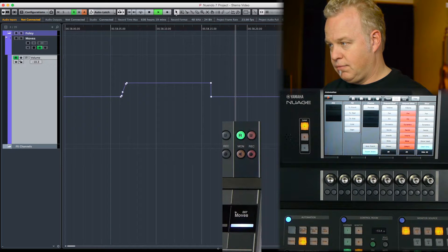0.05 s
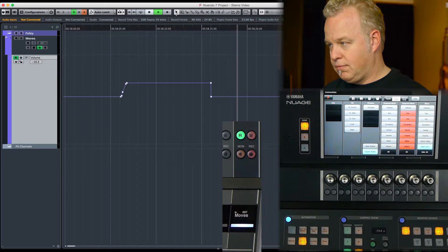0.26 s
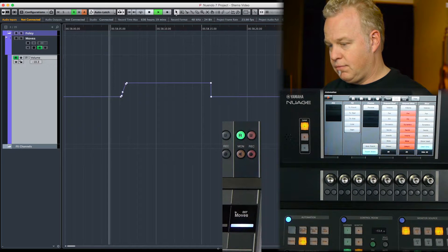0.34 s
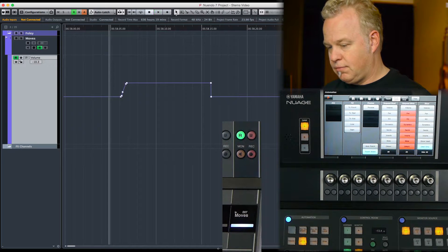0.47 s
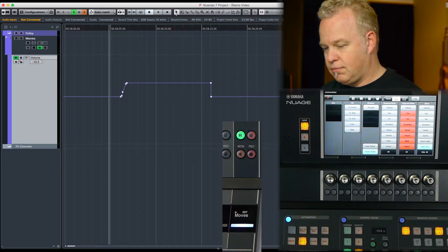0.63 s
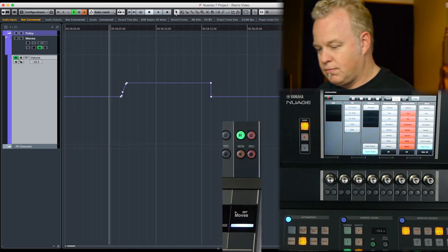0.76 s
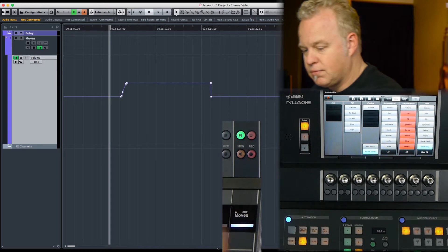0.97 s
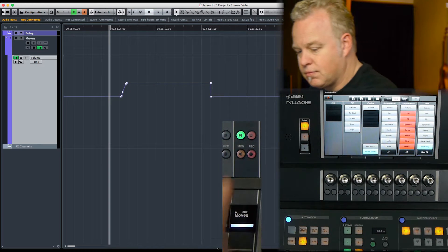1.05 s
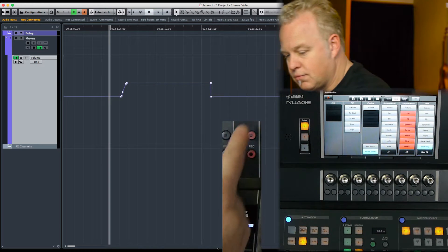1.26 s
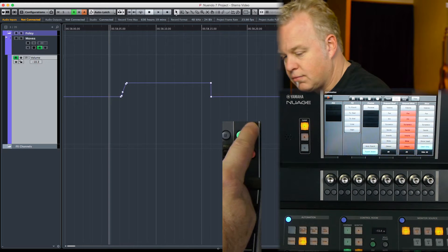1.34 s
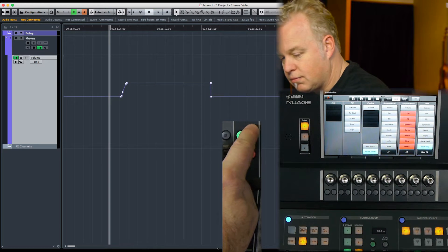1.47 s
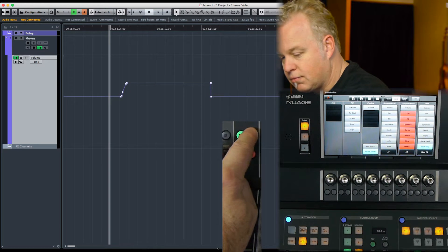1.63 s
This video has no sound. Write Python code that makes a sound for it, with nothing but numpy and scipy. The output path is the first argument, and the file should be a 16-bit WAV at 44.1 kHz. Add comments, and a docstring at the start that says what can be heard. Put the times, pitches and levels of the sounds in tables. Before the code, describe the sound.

Close up in a nearly silent, damped studio, a desk key snaps down and clicks back more quietly, followed by a tiny padded bump and very faint cloth movement over soft equipment fan noise.

```python
"""A faint fan hum and deep rumble are heard first; then a plastic key on a control desk is pushed and let go.
Its cap rattles in its guide, hits bottom, then springs back against its stop: bursts of coloured noise
with fading sine tones for the cap and the desk panel. A soft thud of padded noise bursts follows.
A sleeve rustles as an arm moves: three bands of noise that swell and fade.
One close microphone hears it in a quiet, damped studio with a short and a weaker, slower reverberation."""
import sys
import numpy as np
from scipy import signal
from scipy.fft import rfft, irfft
from scipy.io import wavfile
from scipy.ndimage import map_coordinates

SR = 44100
rng = np.random.default_rng(int(sys.argv[2]) if len(sys.argv) > 2 else 0)


def inscribe(sig):
    """Save sig as 16-bit PCM at rate SR to the path in sys.argv[1].

    A 1-D sig is mono; a 2-D sig holds one channel per row.
    Samples are clipped to [-1, 1] before scaling.
    """
    pcm = np.round(np.clip(np.atleast_2d(sig).T, -1, 1) * 32767)
    wavfile.write(sys.argv[1], SR, pcm.astype(np.int16))


def convert_level_to_amplitude(level_db):
    """Map a level in decibels to its linear amplitude factor."""
    exponent = np.asarray(level_db, float) / 20
    return 10 ** exponent


N = 74970  # length in samples


def unit(x):
    """Scale a sound to an rms of 1."""
    return x / np.sqrt(np.mean(x ** 2) + 1e-20)


def along(points, hz):
    """Read values between (frequency, value) points, on a log frequency axis."""
    point_hz, value = np.transpose(points)
    return np.interp(np.log(hz + 1), np.log(point_hz + 1), value)


def wobble(rate_hz):
    """A smooth curve through random points, rate_hz points a second."""
    points = rng.standard_normal(int(N * rate_hz / SR) + 4)
    return map_coordinates(points, [np.arange(N) * rate_hz / SR])


def level_curve(time_s, level_db):
    """Loudness that moves in straight dB lines between the given times."""
    return convert_level_to_amplitude(np.interp(np.arange(N) / SR, time_s, level_db))


def noise(spectrum, size, tilt_db=0):
    """Coloured noise of rms 1, tilted about 3 kHz by tilt_db per octave."""
    hz = np.fft.rfftfreq(size, 1 / SR)
    gain = convert_level_to_amplitude(along(spectrum, hz) + tilt_db * np.log2((hz + 50) / 3000))
    white = rng.standard_normal(size)
    return unit(irfft(rfft(white) * gain, size))


def burst(spectrum, level_db, rise_s, t60_s, tilt_db=0):
    """Noise that rises fast and dies away, falling 60 dB in t60_s."""
    t = np.arange(8192) / SR
    rise = 1 - np.exp(-(t / rise_s) ** 2)
    return noise(spectrum, size=8192, tilt_db=tilt_db) * convert_level_to_amplitude(level_db - 60 * t / t60_s) * rise


def ring(modes, ring_db, rise_s, tilt_db=0):
    """A struck solid rings in fading sine tones, each a little louder or softer at every blow."""
    scatter_db = 2
    t = np.arange(SR // 2) / SR
    out = np.zeros(len(t))
    for pitch_hz, level_db, t60_s in modes:
        tilted_db = level_db + tilt_db * np.log2(pitch_hz / 500)
        start_db = tilted_db + scatter_db * rng.standard_normal()
        out += convert_level_to_amplitude(start_db - 60 * t / t60_s) * np.sin(2 * np.pi * pitch_hz * t)
    return convert_level_to_amplitude(ring_db) * (1 - np.exp(-t / rise_s)) * out


def add(track, start_s, sound):
    """Mix a sound into the track at a time."""
    part = track[round(start_s * SR):][:len(sound)]
    part += sound[:len(part)]


def rumble():
    """Very low noise that comes and goes."""
    # loudness of the rumble: time_s, level_db
    levels = [(0.0, -75), (0.194, -83.5), (0.24, -51), (0.298, -67), (0.35, -68), (0.728, -76.5),
              (0.808, -68.5), (1.202, -78), (1.7, -77)]
    # colour of the rumble: pitch_hz, level_db (per Hz, relative)
    colour = [(15, -29.5), (30, -0.5), (80, -0.5), (120, -19.5), (200, -60.5)]
    time_s, level_db = np.transpose(levels)
    return level_curve(time_s, level_db) * noise(colour, size=N)


def fans():
    """Equipment fans: a low rush of air with a few tones that waver in level and phase."""
    # colour of the rush: pitch_hz, level_db (per Hz, relative)
    rush_colour = [(15, -50), (40, -12), (90, -3.5), (150, -1.5), (300, -2.5), (550, -6.5), (1000, -12.5),
                   (2000, -24.5), (4500, -21.5), (7000, -28), (12000, -35.5), (15500, -46), (16000, -81)]
    # fan tones: pitch_hz, level_db (rms, before wavering)
    hum = [(153, -80), (230, -78), (540, -82.5)]
    rush_db, swell_db, waver_db = -69.5, 1, 2.5  # the last two scale random curves
    t = np.arange(N) / SR
    tones = np.zeros(N)
    for pitch_hz, level_db in hum:
        loudness = np.sqrt(2) * convert_level_to_amplitude(level_db + waver_db * wobble(42))  # sqrt(2) turns rms into peak
        tones += loudness * np.sin(2 * np.pi * pitch_hz * t + wobble(2))
    rush = convert_level_to_amplitude(rush_db + swell_db * wobble(5)) * noise(rush_colour, size=N)
    return rush + tones


def sleeve():
    """Cloth rubbing on cloth makes noise; three bands swell separately under one fine, shared flutter."""
    # loudness of the rustle: time_s, middle_db, treble_db, low_db
    levels = [(0.561, -87, -93.5, -79.5), (.66, -71.5, -86, -85), (.74, -83, -82.5, -75.5),
              (.86, -70, -78.5, -83.5), (0.958, -75, -81.5, -80.5), (1.04, -71.5, -75.5, -73.5),
              (1.18, -71, -78, -78), (1.29, -67, -86.5, -68.5), (1.36, -74.5, -88, -75.5),
              (1.42, -80.5, -95, -84), (1.55, -97.5, -99, -97.5)]
    # colours of the three bands, each: pitch_hz, level_db (per Hz, relative)
    middle = [(1200, -10), (2000, -5), (3000, -4), (4800, -2.5), (6500, -10), (9000, -25)]
    treble = [(5000, -26), (7000, -5), (9000, -1), (12000, -10), (15000, -6.5), (15700, -6), (16000, -57)]
    low = [(150, -30), (400, 1), (800, -3), (1600, -3.5), (2500, -28)]
    grain_db = .8  # scales the random flutter
    t = np.arange(N) / SR
    time_s, *band_levels = np.transpose(levels)
    out = np.zeros(N)
    for level_db, colour in zip(band_levels, (middle, treble, low)):
        # practically silent before the first point and after the last
        loudness = convert_level_to_amplitude(np.interp(t, time_s, level_db, left=-120, right=-120))
        out += loudness * noise(colour, size=N)
    return out * convert_level_to_amplitude(grain_db * wobble(120))


def thud():
    """Dull padded contacts: bursts of mostly low noise with a soft start."""
    # contacts: start_s, level_db
    contacts = [(.632, -52), (.643, -56), (.654, -57)]
    # colour of a contact: pitch_hz, level_db (per Hz, relative)
    colour = [(120, -30), (280, -10.5), (600, -6.5), (1200, -11.5), (2000, -19.5), (3000, -40), (5000, -32),
              (8000, -57.5)]
    out = np.zeros(N)
    for start_s, level_db in contacts:
        add(out, start_s, burst(colour, level_db, rise_s=.003, t60_s=.11))
    return out


def rattles():
    """The loose cap chatters in its guide: short bursts of bright noise."""
    # knocks: start_s, level_db, rise_s, t60_s, tilt_db (per octave)
    knocks = [(.2355, -5, .0022, .02, 0), (.368, -52, .002, .02, -3), (.4, -40, .001, .08, 0),
              (.4105, -22, .002, .02, 0), (.431, -25, .001, .025, 0), (.451, -32, .004, .04, -1)]
    # colour of the rattle: pitch_hz, level_db (per Hz, relative)
    colour = [(470, -51), (900, -21), (2500, -7), (4400, 1), (5700, -4.5), (7200, -8.5), (11000, -15),
              (15300, -14.5), (16300, -44)]
    out = np.zeros(N)
    for start_s, level_db, rise_s, t60_s, tilt_db in knocks:
        add(out, start_s, burst(colour, level_db, rise_s, t60_s, tilt_db))
    return out


def blows():
    """The cap strikes its end stops: each blow clatters and sets the cap and the desk panel ringing."""
    # strikes: start_s, clatter_db, clatter_t60_s, clatter_tilt_db (per octave),
    # panel_db, panel_tilt_db (per octave), cap_db
    strikes = [(.2423, -8, .016, 0, -21, 0, -5), (.2447, -11, .03, 0, -33, 0, -13),
               (.4192, -25, .03, -1, -45, 3, -27), (.4207, -14, .025, -1, -28, 4, -18)]
    # colour of the clatter: pitch_hz, level_db (per Hz, relative)
    clatter_colour = [(120, -49.5), (300, -22.5), (900, -10), (1500, 1), (2400, -5.5), (3500, -4),
                      (4500, -4.5), (6500, -8.5), (9000, -13), (15000, -21.5), (16300, -52.5)]
    # tones of the desk panel: pitch_hz, level_db (relative), t60_s
    panel = [(160, -22, .3), (255, -8, .2), (324, -1, .12), (400, -6, .12), (478, 1, .09), (630, -13, .08),
             (770, -6, .07), (848, -6, .07), (1100, -6, .06), (1390, -13, .07), (543, -20, .55),
             (1577, -29, .35)]
    # tones of the key cap: pitch_hz, level_db (relative), t60_s
    cap = [(1600, -8, .012), (2000, 1, .017), (2430, -1, .013), (2900, 0, .012), (3350, -2, .013),
           (4200, -8, .01)]
    blow_rise_s, panel_rise_s = .00015, .001
    out = np.zeros(N)
    for start_s, clatter_db, t60_s, tilt_db, panel_db, panel_tilt_db, cap_db in strikes:
        add(out, start_s, burst(clatter_colour, clatter_db, blow_rise_s, t60_s, tilt_db))
        add(out, start_s, ring(panel, panel_db, panel_rise_s, panel_tilt_db))
        add(out, start_s, ring(cap, cap_db, blow_rise_s))
    return out


def key():
    """The key: chatter in the guide and blows on the stops."""
    return rattles() + blows()


def room(x, decay):
    """Reverberation: a delayed noise tail in which each frequency dies at its own speed."""
    delay_s = 0.0045
    hz, t, z = signal.stft(rng.standard_normal(SR // 2), SR, nperseg=256)
    fading = z * convert_level_to_amplitude(-60 * t / along(decay, hz)[:, None])
    tail = signal.istft(fading, SR, nperseg=256)[1]
    delayed = np.pad(x, (round(delay_s * SR), 0))
    return signal.fftconvolve(delayed, tail / np.linalg.norm(tail))[:N]


def scene():
    """Everything at one microphone; the key and the thud also excite the room."""
    # short reverberation: pitch_hz, t60_s
    short_decay = [(150, 0.23), (500, 0.17), (1500, 0.11), (4000, 0.13), (8000, 0.13), (15000, 0.084)]
    # slower, weaker reverberation: pitch_hz, t60_s
    late_decay = [(150, 0.81), (1000, 0.59), (4000, 0.4), (7000, 0.59), (15000, 0.21)]
    # such small things radiate little below 130 Hz
    low_cut = signal.butter(3, 130, "high", fs=SR, output="sos")
    near = signal.sosfilt(low_cut, key() + thud())
    echoes = convert_level_to_amplitude(-9.5) * room(near, short_decay) + convert_level_to_amplitude(-26.5) * room(near, late_decay)
    return (near + echoes + sleeve() + fans() + rumble())[None]


def top_cut(x):
    """Nothing passes above the cut-off."""
    return signal.sosfilt(signal.butter(12, 16810, fs=SR, output="sos"), x)


def record(dry):
    """Peaks are rounded off smoothly so that none passes full scale."""
    top, knee = 1.0, 8  # a higher knee bends more sharply
    mix = dry / (1 + np.abs(dry / top) ** knee) ** (1 / knee)
    return top_cut(mix)


dry = scene()
out = record(dry)
inscribe(out)
```